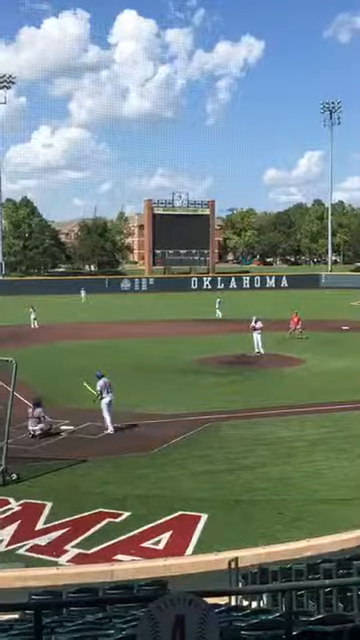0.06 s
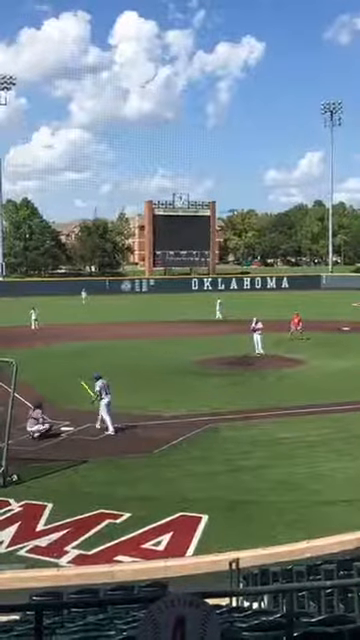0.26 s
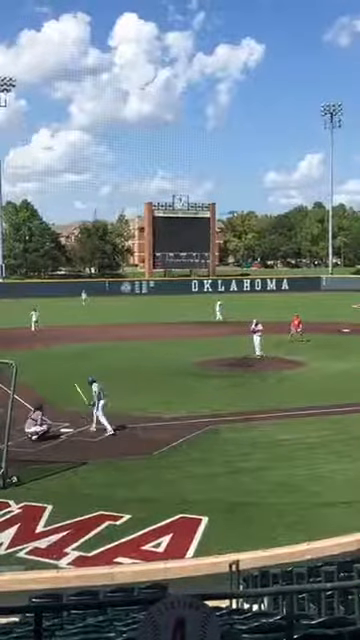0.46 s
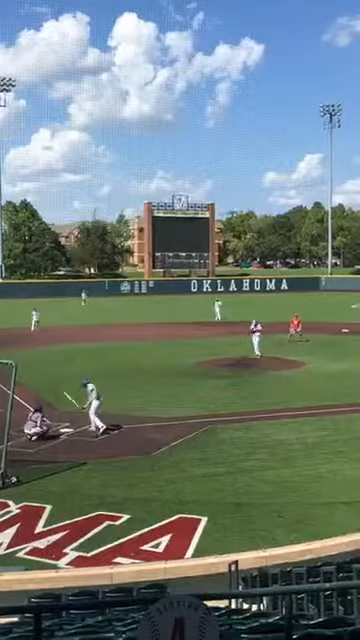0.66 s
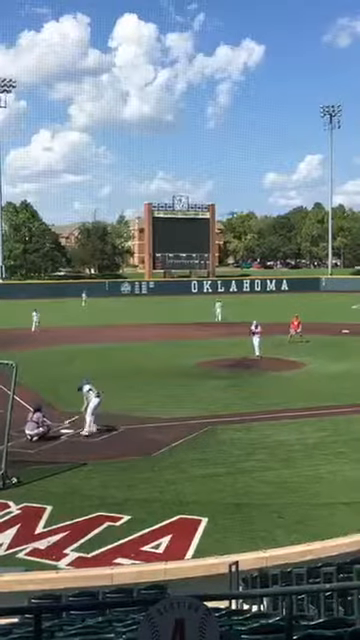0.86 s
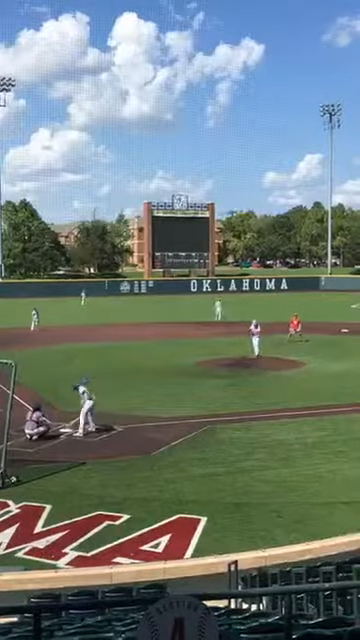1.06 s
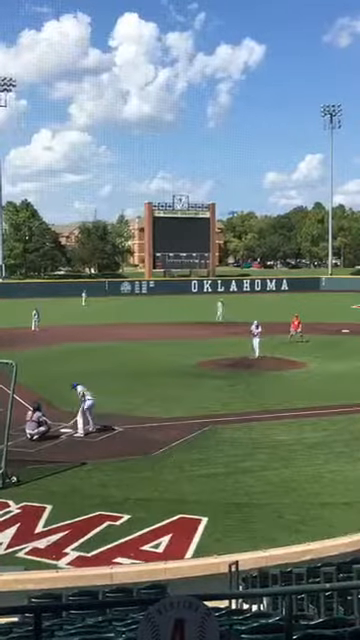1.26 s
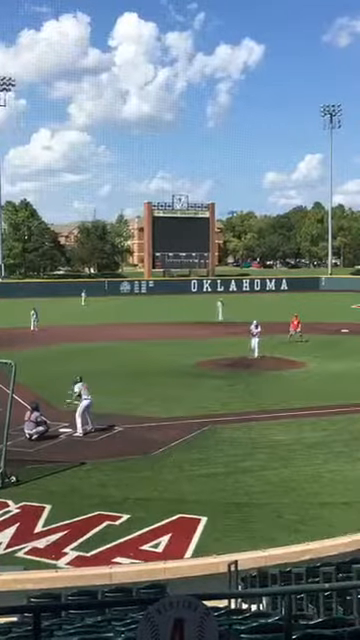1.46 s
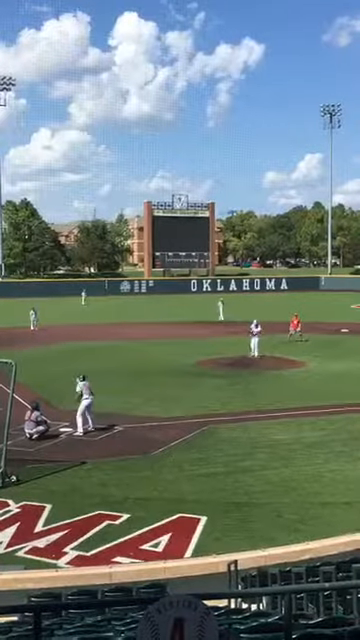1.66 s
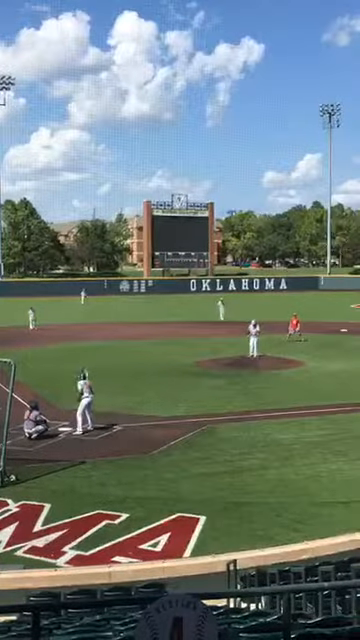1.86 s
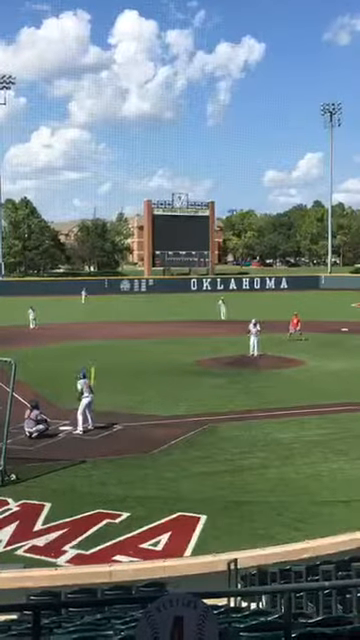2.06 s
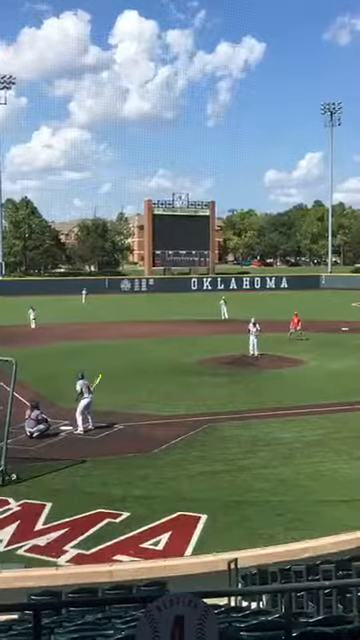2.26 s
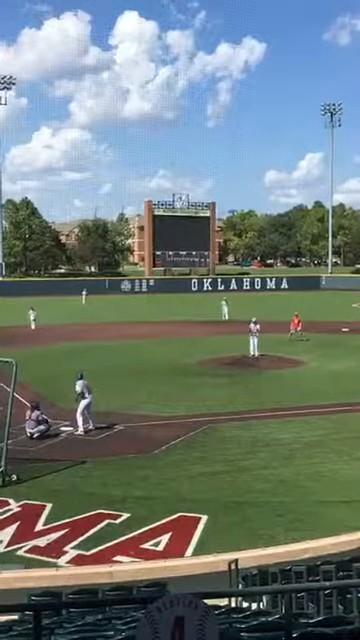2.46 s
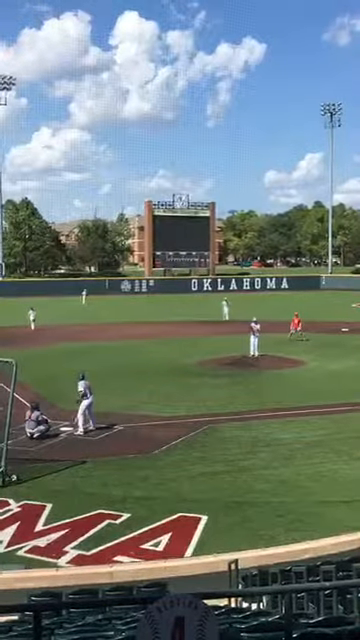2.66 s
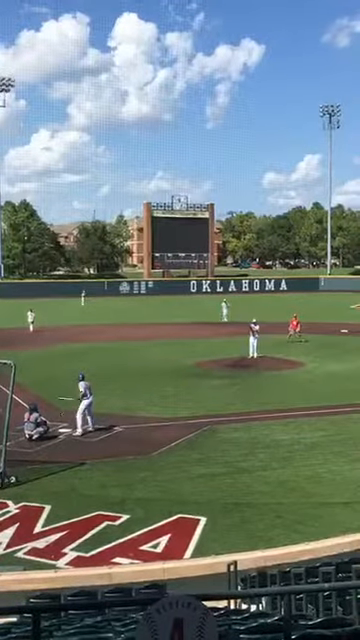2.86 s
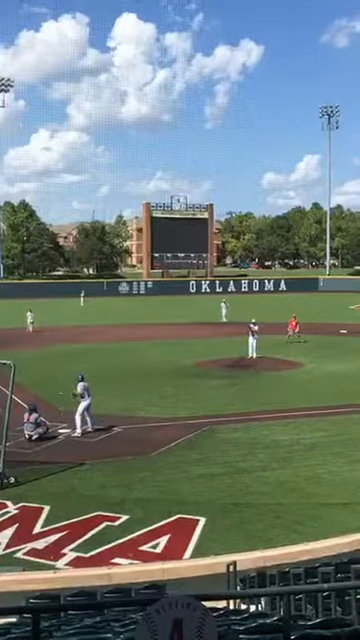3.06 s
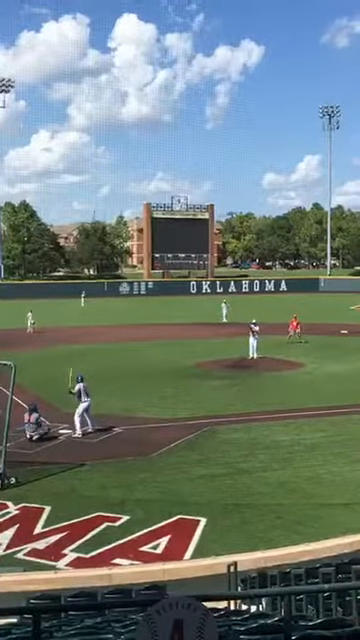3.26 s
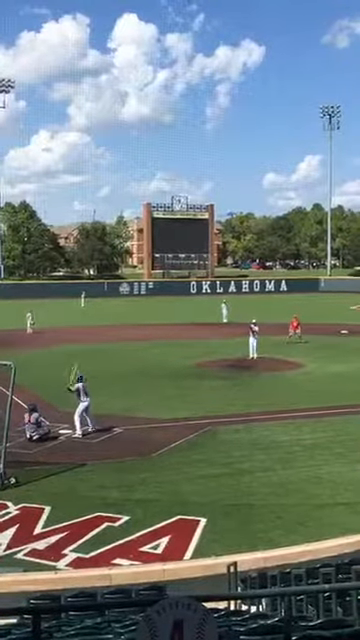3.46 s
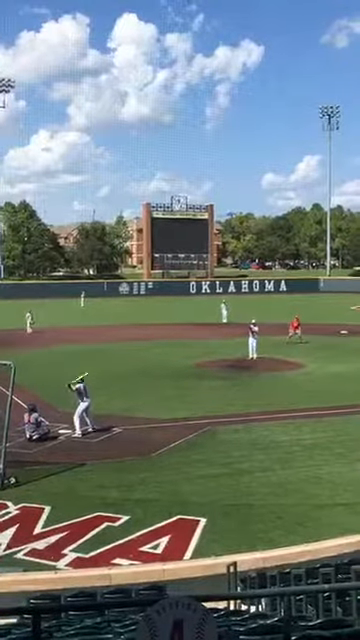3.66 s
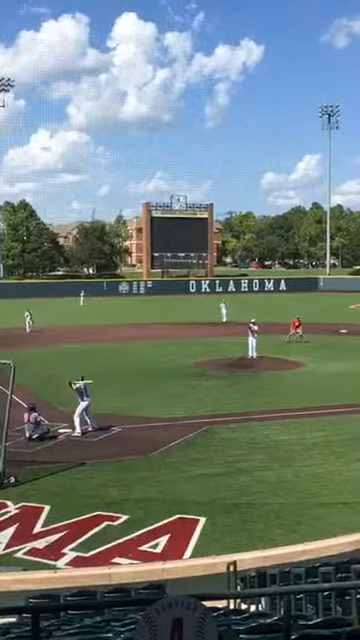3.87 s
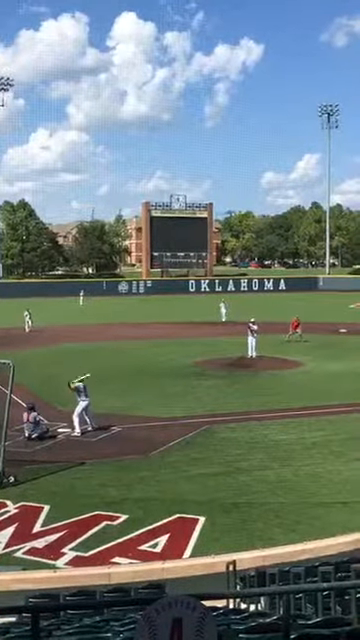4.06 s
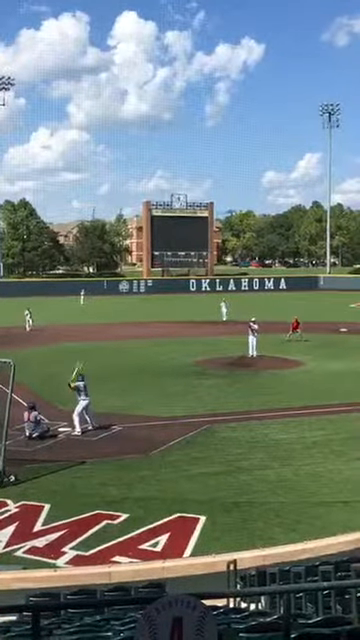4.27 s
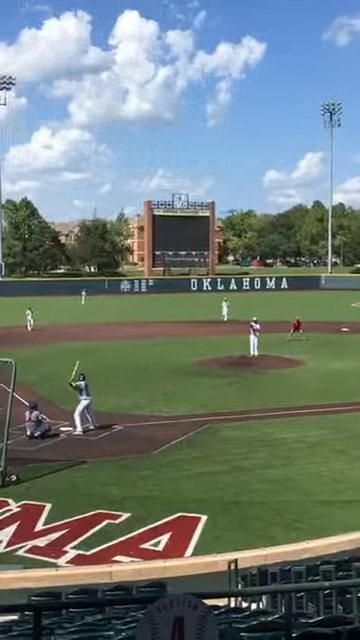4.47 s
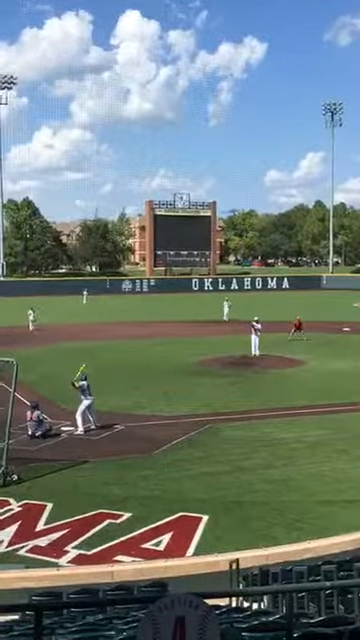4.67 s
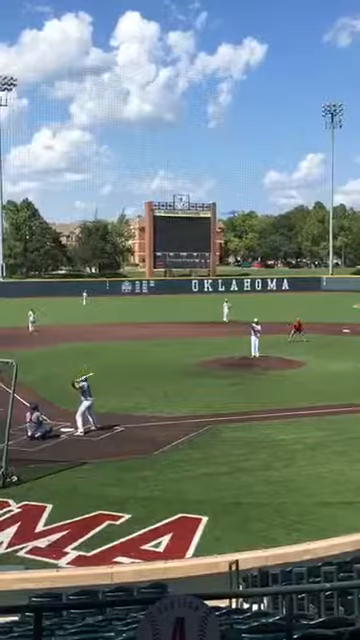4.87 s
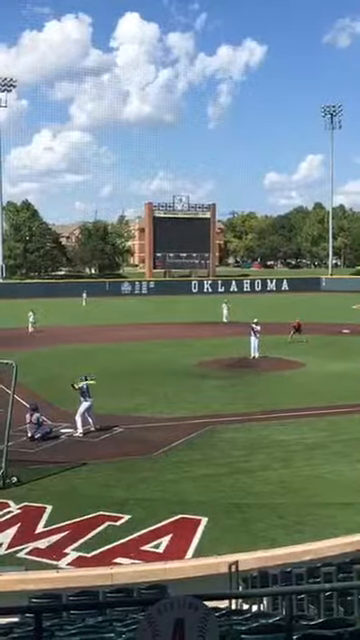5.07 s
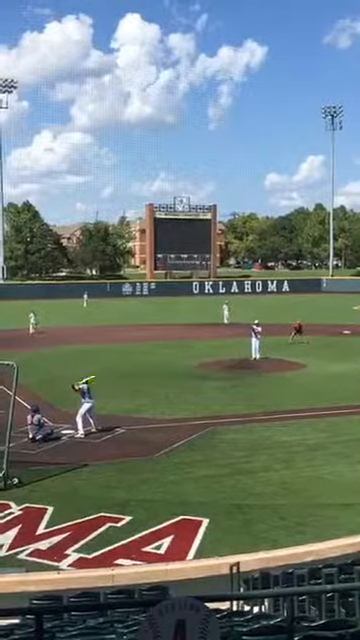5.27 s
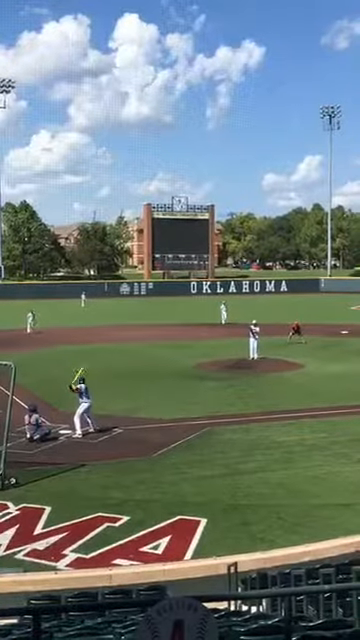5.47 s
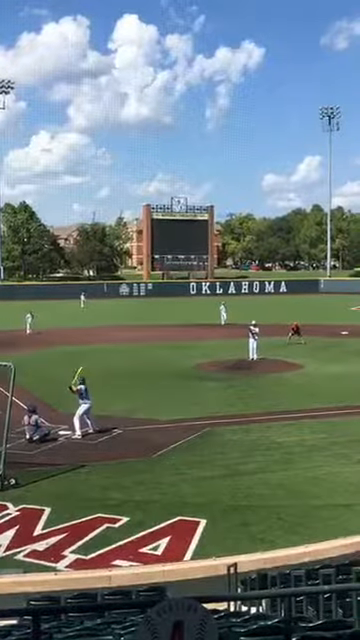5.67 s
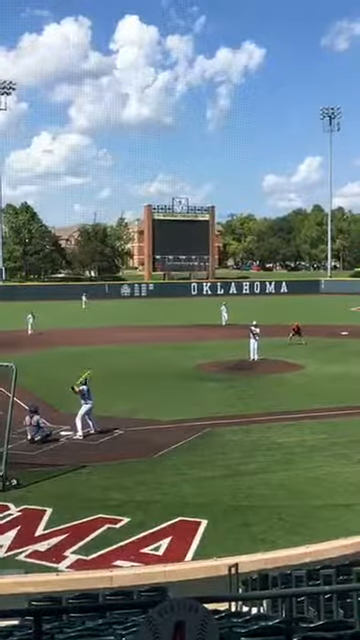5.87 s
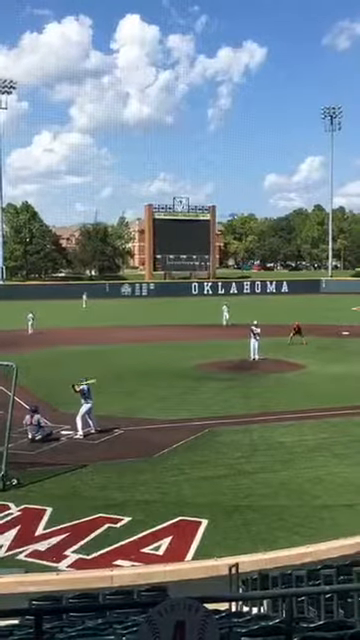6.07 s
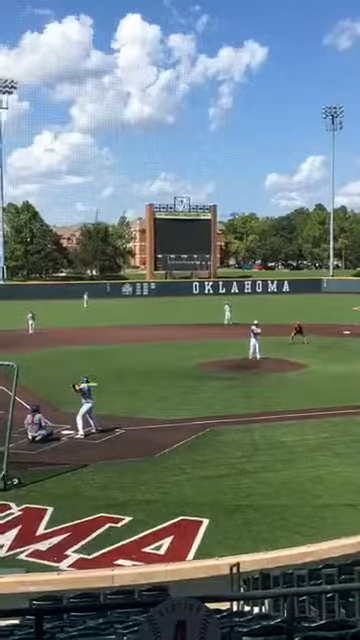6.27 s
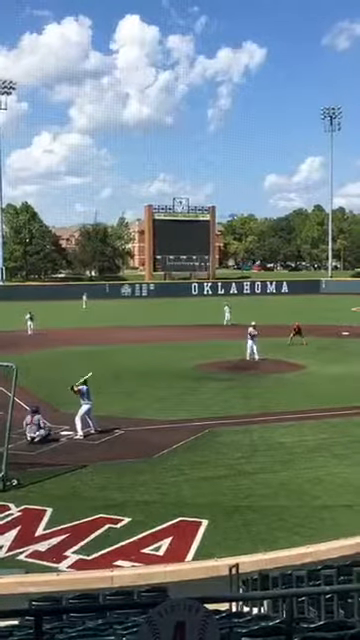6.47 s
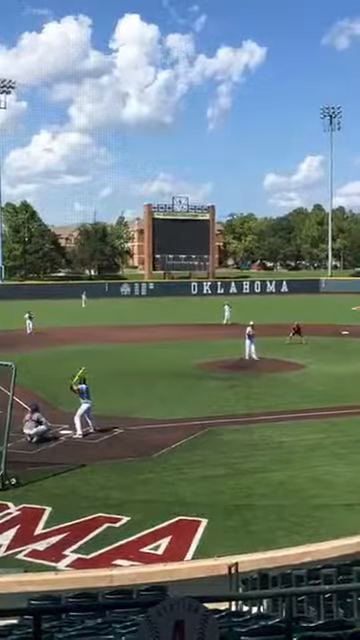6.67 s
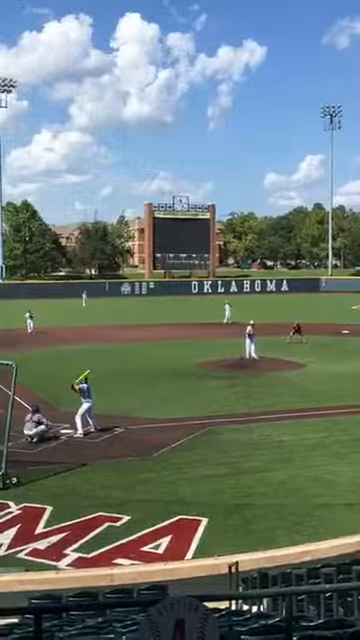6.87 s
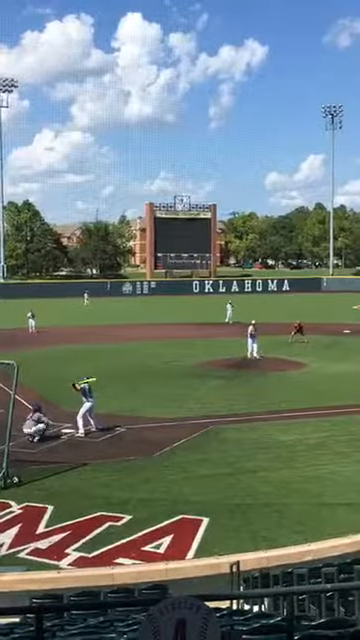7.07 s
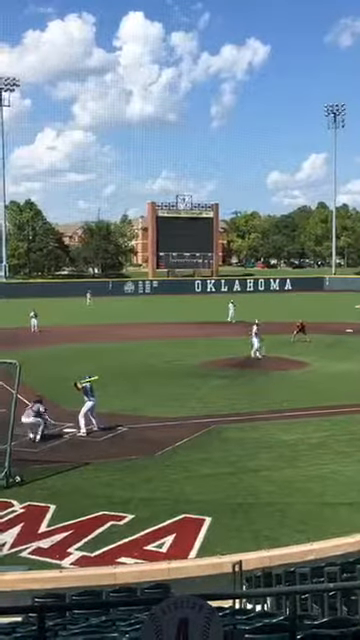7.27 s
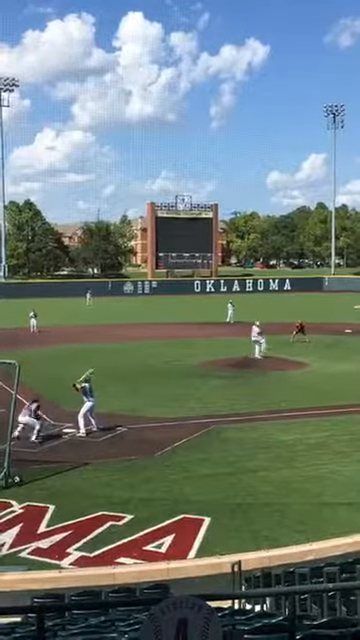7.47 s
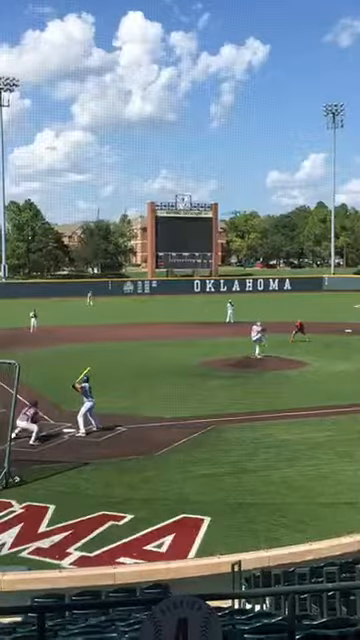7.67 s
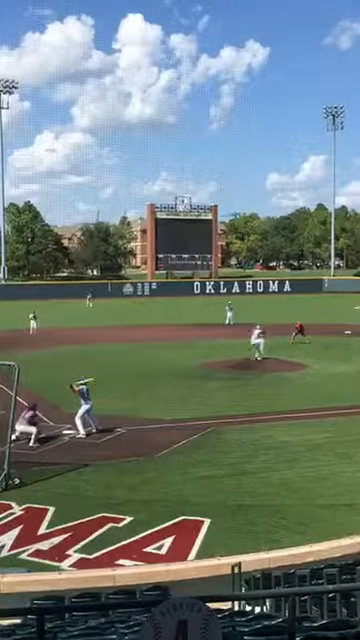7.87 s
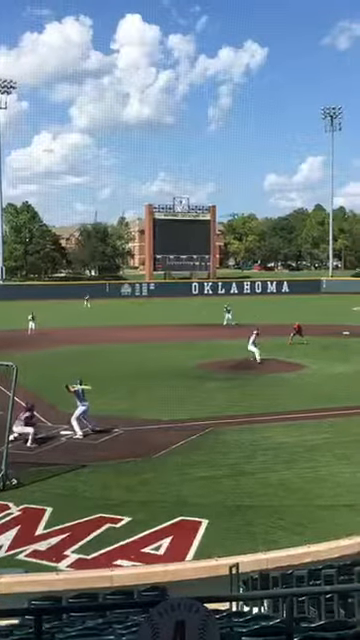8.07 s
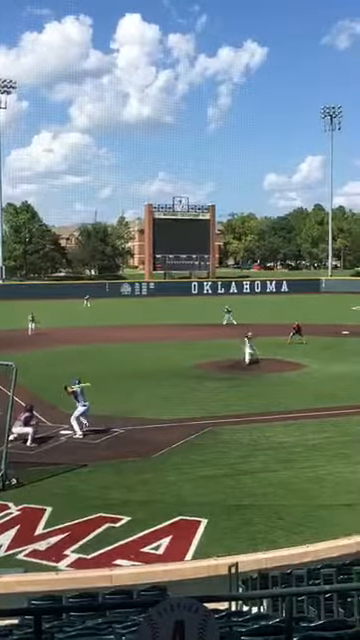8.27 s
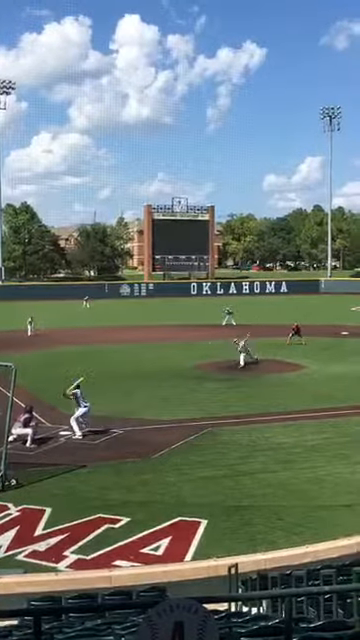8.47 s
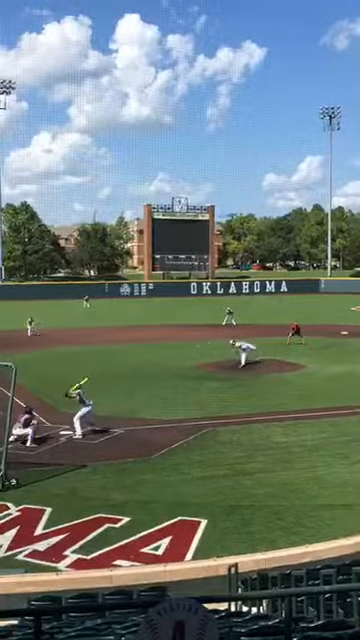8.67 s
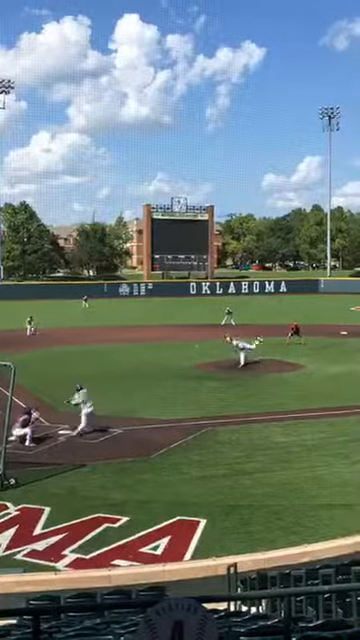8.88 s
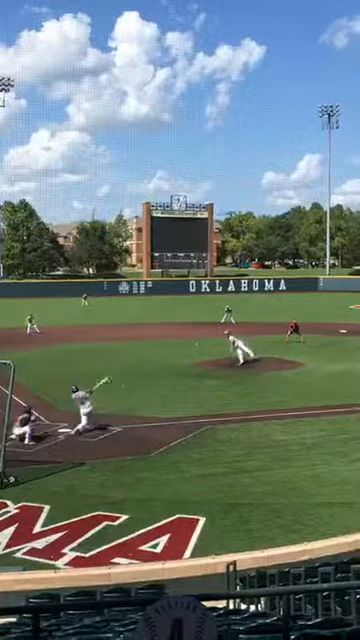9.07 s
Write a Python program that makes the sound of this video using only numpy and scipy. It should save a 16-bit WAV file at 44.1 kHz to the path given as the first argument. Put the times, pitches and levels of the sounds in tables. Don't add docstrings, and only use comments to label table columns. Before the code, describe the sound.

From the stands of an open, nearly empty ball field, a parked engine drones low and steady over soft town hum. A faint hollow tap rings early, among small gritty scuffs and cloth rustles. Thin birds peep high above. At about nine seconds a hollow bat cracks sharply on the ball, by far the loudest sound, with short clattering echoes off the stands. A distant phone microphone, single channel.

```python
import sys
import numpy as np
from scipy import signal
from scipy.fft import rfft, irfft
from scipy.io import wavfile
from scipy.ndimage import uniform_filter1d

SR = 44100
rng = np.random.default_rng(int(sys.argv[2]) if len(sys.argv) > 2 else 0)


def gain_from_decibels(decibels):
    exponent = np.asarray(decibels, float) / 20
    return 10 ** exponent


def to_wav(s):
    ch = np.atleast_2d(s).T
    pcm = np.round(np.clip(ch, -1, 1) * 32767)
    wavfile.write(sys.argv[1], SR, pcm.astype(np.int16))


N = 402633
T = np.arange(N) / SR

# (frequency [Hz], density [dB per Hz])
TOWN_SPECTRUM = [(20, -42), (33, -20), (45, -10), (62, -8), (72, -9.5), (104, -14), (125, -16), (177, -22),
                 (250, -24.5), (400, -30), (500, -34), (650, -34),
                 (800, -34.5), (1100, -39), (1500, -41), (2200, -45.5), (3000, -50), (4500, -54.5),
            (6000, -57.5), (7500, -61), (10100, -64), (10500, -70), (11200, -67), (15300, -71.5)]
TOWN_DB = -45

# (time [s], level [dB])
ENGINE_LOAD = [(0.0, -41), (0.07, -36.5), (0.2, -43), (0.79, -34.5), (1.27, -42), (2.84, -37), (3.02, -46),
               (3.28, -38), (5.42, -40.5), (5.49, -45.5), (6.61, -39), (7.09, -46), (7.27, -37),
               (7.8, -39.5), (7.93, -46), (8.03, -40), (9.03, -40.5), (9.13, -49)]
# (multiple of turn rate [-], level [dB], wander [dB])
ENGINE_ORDERS = [
    (4, -13, 3.5),
    (5, 0.2, 0.6),
]
# (frequency [Hz], level [dB])
ENGINE_WHINES = [
    (280, -63),
    (364, -68),
    (447, -71.5),
    (786, -74),
]
TURN_HZ = 11.41
EIGHTH_DB, EIGHTH_SWELL_DB = -52, 4

# (start [s], length [s], first pitch [Hz], last pitch [Hz],
# level [dB])
BIRD_PEEPS = [(0.0, .12, 7750, 7800, -88), (.355, .085, 9014, 9014, -83), (.42, .04, 6500, 6490, -78),
              (.45, .05, 7000, 7300, -76), (.75, .06, 6300, 6300, -74), (.9, .11, 7000, 6600, -80),
              (1.58, .1, 8800, 8200, -78), (1.66, .13, 6750, 7300, -80), (2.555, .11, 8400, 8010, -83),
              (3.45, .18, 8500, 8300, -81), (4.09, .08, 7100, 7150, -81), (4.4, .06, 5930, 6200, -77),
              (4.475, .11, 7950, 7800, -79), (4.9, .1, 5850, 5950, -79), (5.0, .11, 6150, 6250, -75),
              (5.015, .055, 8270, 8170, -78), (5.15, .07, 8430, 8350, -81), (5.2, 0.063, 5770, 5900, -76),
              (5.235, .11, 8200, 7950, -86), (.44, .05, 8600, 7800, -81), (5.1, .07, 6600, 6700, -82),
              (5.87, .16, 8000, 7700, -76), (6.55, .07, 8450, 8430, -77), (6.61, .05, 6800, 7100, -72),
               (6.63, .16, 7950, 7970, -73), (7.05, .12, 7100, 7200, -85), (7.36, .05, 5980, 6040, -77),
               (7.45, .04, 8380, 8390, -80), (7.8, .04, 8770, 9090, -79), (8.53, .07, 8450, 7800, -79),
               (8.8, .06, 8570, 8500, -81), (8.86, .08, 8300, 8000, -78), (5.79, .06, 8200, 8250, -72),
               (7.24, .07, 7750, 7750, -83), (6.9, .04, 8100, 7900, -78), (8.15, .06, 5700, 5750, -82),
               (7.79, .05, 7500, 7450, -82)]
# (start [s], length [s], first pitch [Hz], last pitch [Hz], level [dB])
BIRD_SWEEPS = [(.81, .19, 6600, 7800, -78), (4.19, .04, 6800, 9000, -75), (4.225, .035, 8900, 6300, -76),
               (4.465, .03, 6600, 8000, -80), (4.325, 0.068, 7000, 9050, -74), (4.99, .03, 6800, 8050, -82),
               (5.685, .035, 4800, 7000, -70), (5.715, .13, 6800, 8600, -65), (6.615, .04, 6500, 7900, -75),
               (5.83, .04, 6400, 7300, -73), (6.93, .11, 8000, 7030, -74)]
SWEEP_SETTLE = 4
# (start [s], end [s], top pitch [Hz], drop [Hz], note rate [per s], level [dB])
BIRD_TRILLS = [
    (0.999, 1.16, 7800, 1500, 27, -73.5),
    (7.819, 8.088, 8500, 450, 29, -74),
]
CALL_S, CALL_HOLD_S, CALL_CLIMB_S = 4.07, .18, .065
CALL_HZ, CALL_TURN_HZ, CALL_TOP_HZ = 5650, 6020, 7050
CALL_DB, CALL_TOP_DB = -76.5, -62
NOTE_ATTACK_S, NOTE_FADE_DB, NOTE_EDGE_DB = 0.011, -4, -8

# (time [s], swell [s], centre [Hz], width [Hz],
# level [dB])
SOFT_RUSTLES = [(.5, .05, 7500, 3000, -72), (.9, .06, 2400, 2500, -62.5), (.9, .03, 694, 200, -59),
                (.92, .04, 1550, 150, -64), (1.001, .022, 198, 149, -48.5), (1.342, .06, 1900, 2500, -58),
                (1.62, .06, 5500, 910, -73.5), (2.98, .045, 5500, 2500, -80), (3.3, .06, 4000, 1000, -75),
                (3.64, .045, 5800, 1500, -73), (5.6, .022, 6000, 1200, -73.5), (5.9, .04, 7650, 1500, -67),
                (6.22, .03, 4000, 900, -73), (6.379, .04, 6000, 1400, -75), (6.68, .06, 7400, 2000, -73),
                (7.62, 0.063, 6840, 1210, -75), (8.5, .022, 9900, 5000, -75), (1.05, .07, 6800, 1800, -74),
                (8.55, .08, 6800, 1500, -77), (8.73, 0.037, 3330, 700, -64), (8.73, .03, 7000, 5000, -68),
                (7.4, .05, 5700, 1000, -77)]
RUSTLE_FALL = 1.26
# (time [s], fall [s], centre [Hz], width [Hz], level [dB])
SHARP_TICKS = [
    (.745, .0045, 7000, 6050, -67),
    (.858, .012, 3600, 2000, -63),
    (3.7, .009, 5900, 6000, -69.5),
    (4.58, .01, 12500, 3000, -80),
    (5.19, .01, 12500, 3020, -85),
    (5.909, .0072, 5470, 9000, -58),
    (7.87, 0.013, 3500, 2060, -64),
    (8.69, .05, 6500, 6500, -65),
    (9.045, .033, 330, 250, -44),
]
TICK_RISE_S = .004

PING_S, PING_HOLD_S, PING_HZ, PING_DB = .872, .105, 1797, -52
BEAT_S, BEAT_DB, BEAT_LOSS_DB = .032, -62, -3
# (start [s], length [s], first pitch [Hz], last pitch [Hz], level [dB])
TAP_KNOCKS = [
    (0.853, 0.032, 1040, 1010, -49),
    (0.881, 0.029, 975, 930, -51),
    (0.916, 0.133, 930, 973, -59.5),
]

# (frequency [Hz], level [dB], 60 dB decay [s])
BARREL_MODES = [(1086, 0, 0.033), (1257, -9.5, 0.03), (1420, -43, 0.026), (1800, -13, 0.023),
                (2346, -15.5, 0.033), (2590, -30, 0.039), (3040, -16, 0.0076), (3330, -8, 0.0099),
                (4500, -19, 0.006), (5000, -16.5, 0.0071), (6360, -22.5, 0.012), (8270, -25.5, 0.0087)]
# (time [s], level [dB])
CRACK_ARRIVALS = [(9.0435, -2), (9.0476, -14), (9.054, -13.5), (9.056, -21.5), (9.0608, -23), (9.0647, -22),
                  (9.0857, -22), (9.0935, -21), (9.099, -19), (9.1125, -21.5), (9.125, -22.5)]
# (start [s], length [s], first pitch [Hz], last pitch [Hz], level [dB])
SEAT_ROWS = [
    (9.069, 0.043, 2585, 2590, -33.5),
    (9.11, .03, 2590, 2630, -44),
    (9.071, .024, 1420, 1425, -36.5),
    (9.093, 0.036, 1420, 1425, -42),
]
SCATTER_DB, SCATTER_T60_S, SCATTER_RATE = -39, .4, 12000


def band(x, hz, width):
    return signal.lfilter(*signal.iirpeak(min(hz, .45 * SR), hz / width, fs=SR), x)


def unit(x):
    return x / np.sqrt(np.mean(x ** 2))


def walk(rate, size=N):
    hold = max(int(SR / rate), 1)
    steps = np.repeat(rng.standard_normal(size // hold + 1), hold)
    return 1.22 * uniform_filter1d(uniform_filter1d(steps, hold), hold)[:size]


def walk_for(t, rate):
    return walk(rate, size=SR // 3)[:len(t)]


def add(out, s, x):
    i = max(int(s * SR), 0)
    out[i:i + len(x)] += x[:N - i]


def note(start, length, first_hz, last_hz, db, attack=NOTE_ATTACK_S, fade_db=NOTE_FADE_DB, settle=0):
    u = np.linspace(0, 1, num=33)
    slide = (1 - np.exp(-settle * u)) / (1 - np.exp(-settle)) if settle else u
    pitch = first_hz + (last_hz - first_hz) * slide
    edge = np.clip(1 - np.minimum(u, 1 - u) * length / attack, 0, 1)
    level = db + fade_db * u + NOTE_EDGE_DB * edge
    return np.transpose([start + length * u, pitch, level])


def whistle(table, flutter_db, flutter_rate, waver):
    s, hz, db = np.transpose(table)
    t = np.arange(s[0], s[-1], 1 / SR)
    pitch = np.interp(t, s, hz) * (1 + waver * walk_for(t, flutter_rate))
    gain = gain_from_decibels(np.interp(t, s, db) + flutter_db * walk_for(t, flutter_rate))
    ends = signal.windows.tukey(len(t), min(200 / len(t), 1))
    return np.sqrt(2) * gain * ends * np.sin(2 * np.pi * np.cumsum(pitch) / SR)


def town():
    f = np.maximum(np.fft.rfftfreq(N, 1 / SR), 1)
    hz, db = np.transpose(TOWN_SPECTRUM)
    colour = rfft(rng.standard_normal(N)) * gain_from_decibels(np.interp(np.log(f), np.log(hz), db))
    out, gust = 0, walk(0.41)
    for step in range(8, 30):
        share = np.clip(1 - abs(2 * np.log2(f) - step), 0, 1)
        swell = gain_from_decibels(0.2 * gust + 0.83 * walk(2.434) + 0.99 * walk(12))
        out = out + swell * irfft(colour * share, N)
    return gain_from_decibels(TOWN_DB) * unit(out)


def engine():
    s, load_db = np.transpose(ENGINE_LOAD)
    turn = 2 * np.pi * TURN_HZ * T + .12 * walk(1.45)
    orders = 0
    for multiple, db, wander in ENGINE_ORDERS:
        orders = orders + gain_from_decibels(db + wander * walk(4)) * np.sin(multiple * turn + 6 * rng.random())
    eighth_db = EIGHTH_DB + EIGHTH_SWELL_DB * np.tanh(2 * walk(6.5)) + 2.0 * walk(6.5)
    eighth = gain_from_decibels(eighth_db) * np.sin(8 * turn)
    whines = 0
    for hz, db in ENGINE_WHINES:
        whines = whines + gain_from_decibels(db + 1.9 * walk(5.2)) * np.sin(2 * np.pi * (hz * T + 0.16 * walk(3)))
    return np.sqrt(2) * (gain_from_decibels(np.interp(T, s, load_db)) * orders + eighth + whines)


def trill(start, end, hz, drop_hz, rate, db):
    beat = np.arange(0, end - start, 1 / SR) * rate % 1
    pitch = (hz - drop_hz * beat) * (1 + .012 * walk_for(beat, rate))
    chips = np.sin(2 * np.pi * np.cumsum(pitch) / SR)
    return gain_from_decibels(db + 4.7 * walk_for(beat, rate)) * np.sin(np.pi * beat) ** 2 * chips * 2


def birds():
    out = np.zeros(N)
    for row in BIRD_PEEPS:
        add(out, row[0], whistle(note(*row), 4.5, 150, 0.017))
    for row in BIRD_SWEEPS:
        sweep = note(*row, attack=.005, fade_db=-5.5, settle=SWEEP_SETTLE)
        add(out, row[0], whistle(sweep, 3.5, 120, 0.009))
    turn = CALL_S + CALL_HOLD_S
    hold = note(CALL_S, CALL_HOLD_S, CALL_HZ, CALL_TURN_HZ, CALL_DB, fade_db=1.5)
    climb = note(turn, CALL_CLIMB_S, CALL_TURN_HZ, CALL_TOP_HZ, CALL_TOP_DB, fade_db=0.0)
    add(out, CALL_S, whistle(hold, 2.5, 60, 0.0057))
    add(out, turn, whistle(climb, 2.1, 120, 0.0057))
    for row in BIRD_TRILLS:
        add(out, row[0], trill(*row))
    smear = rng.standard_normal(3000) * gain_from_decibels(-60 * T[:3000] / 0.3)
    return out + gain_from_decibels(-32.5) * signal.fftconvolve(out, smear)[:N]


def scuffs():
    out = np.zeros(N)
    rows = [(s, swell, RUSTLE_FALL * swell, *rest) for s, swell, *rest in SOFT_RUSTLES]
    rows += [(s, TICK_RISE_S, *rest) for s, *rest in SHARP_TICKS]
    for s, rise, fall, hz, width, db in rows:
        t = np.arange(-2 * rise, 3.5 * fall, 1 / SR)[:SR // 3]
        shape = np.where(t < 0, np.exp(-(t / rise) ** 2), np.exp(-t / fall))
        grit = rng.standard_normal(SR // 3)[:len(t)] * gain_from_decibels(2.0 * walk_for(t, 361))
        rub = unit(band(band(grit, hz, width), hz, 1.3 * width))
        add(out, s - 2 * rise, gain_from_decibels(db) * shape * rub)
    return out


def far_tap():
    out = np.zeros(N)
    ping = note(PING_S, PING_HOLD_S, PING_HZ, PING_HZ, PING_DB, attack=.01, fade_db=-1.0)
    add(out, PING_S, whistle(ping, 1.1, 120, 0.0031))
    for k in range(5):
        s = PING_S + PING_HOLD_S + (k + 1) * BEAT_S
        beat = note(s, .9 * BEAT_S, PING_HZ, PING_HZ, BEAT_DB + k * BEAT_LOSS_DB, fade_db=-.6)
        add(out, s, whistle(beat, 1.1, 120, 0.0028))
    for row in TAP_KNOCKS:
        add(out, row[0], whistle(note(*row, attack=.004, fade_db=-10), 2.2, 133, 0.033))
    return out


def park(body, snap):
    out = np.zeros(N)
    (start, direct_db), *echoes = CRACK_ARRIVALS
    add(out, start, gain_from_decibels(direct_db) * (body + snap))
    for s, db in echoes:
        add(out, s, gain_from_decibels(db) * (body + gain_from_decibels(-5.5) * snap))
    t = T[:SR // 8]
    hits = rng.standard_normal(len(t)) * (rng.random(len(t)) < SCATTER_RATE / SR)
    hits = hits * gain_from_decibels(SCATTER_DB - 60 * t / SCATTER_T60_S) * (1 - np.exp(-t / 0.0023))
    ring_t = T[:len(body)]
    blurred = gain_from_decibels(1.0) * body * gain_from_decibels(-60 * ring_t / 0.046)
    blurred = blurred + gain_from_decibels(12.5) * snap * gain_from_decibels(-60 * ring_t / 0.0025)
    add(out, start, signal.fftconvolve(hits, blurred))
    for row in SEAT_ROWS:
        add(out, row[0], whistle(note(*row, attack=.006, fade_db=-4), 1.8, 240, .004))
    hiss = band(band(rng.standard_normal(len(t)), 5500, 7000), 5200, 9000)
    add(out, start, gain_from_decibels(-46 - 60 * t / .25) * hiss)
    ahead = rng.standard_normal((2, 700)) * np.linspace(0, 1, 700)
    upper = gain_from_decibels(-24) * band(band(ahead[0], 2500, 350), 3000, 350)
    lower = gain_from_decibels(-19) * band(band(ahead[1], 1150, 350), 1150, 350)
    add(out, start - 700 / SR, upper + lower)
    out = out - band(out, 550, 250)
    return signal.sosfilt(signal.butter(4, 620, "high", fs=SR, output="sos"), out)


def bat():
    t = T[:4000]
    ring = {hz: gain_from_decibels(db - 60 * t / t60) * np.sin(2 * np.pi * hz * t) for hz, db, t60 in BARREL_MODES}
    split_hz, body_delay_s = 2700, .00033
    body = -sum(x for hz, x in ring.items() if hz < split_hz) * (1 - np.exp(-t / 0.00065))
    body = np.pad(body, (int(body_delay_s * SR), 0))[:len(t)]
    snap = sum(x for hz, x in ring.items() if hz >= split_hz)
    slap = band(band(rng.standard_normal(len(t)), 7400, 8000), 5700, 9400)
    snap = snap + gain_from_decibels(-25 - 60 * t / 0.02) * slap
    return body, snap * (1 - np.exp(-t / .0001))


def scene():
    return (town() + engine() + birds() + scuffs() + far_tap() + park(*bat()))[None]


def band_limit(x):
    return signal.sosfilt(signal.butter(12, 15370, fs=SR, output="sos"), x)


def record(dry):
    top = signal.ellip(8, .2, 60, 15150, fs=SR, output="sos")
    mix = signal.sosfilt(top, dry)
    return band_limit(mix)


dry = scene()
out = record(dry)
to_wav(out)
```